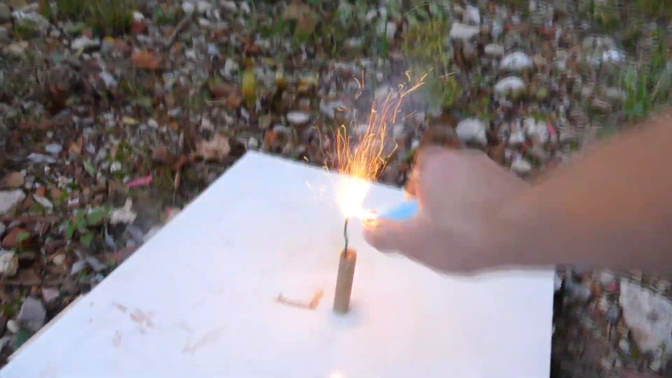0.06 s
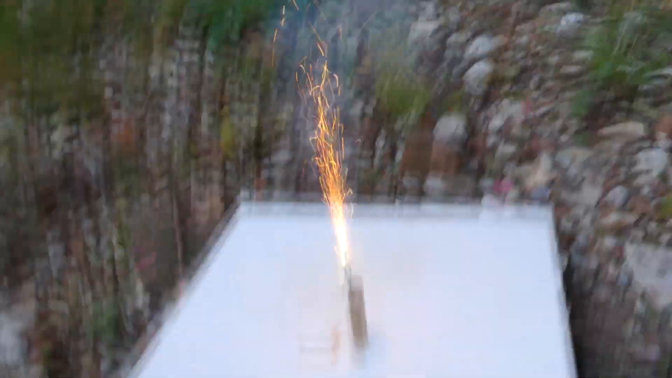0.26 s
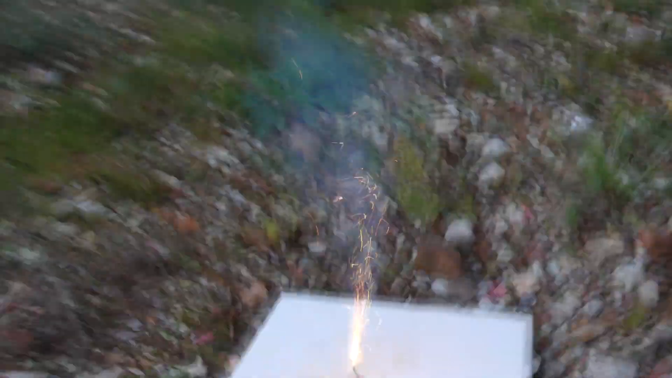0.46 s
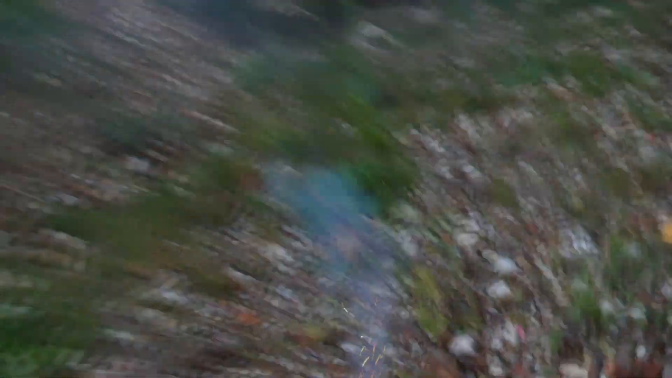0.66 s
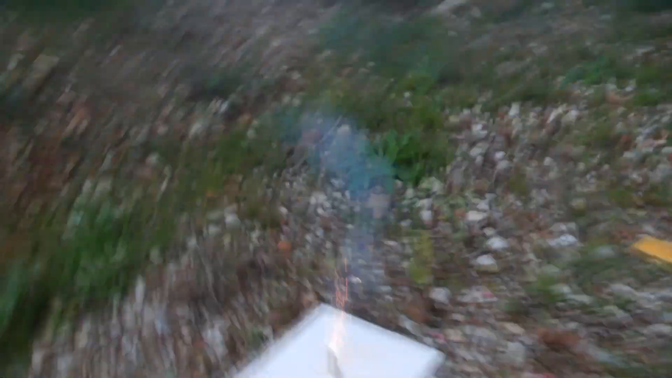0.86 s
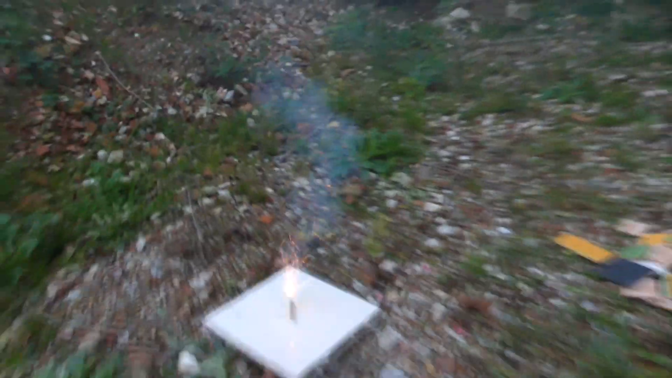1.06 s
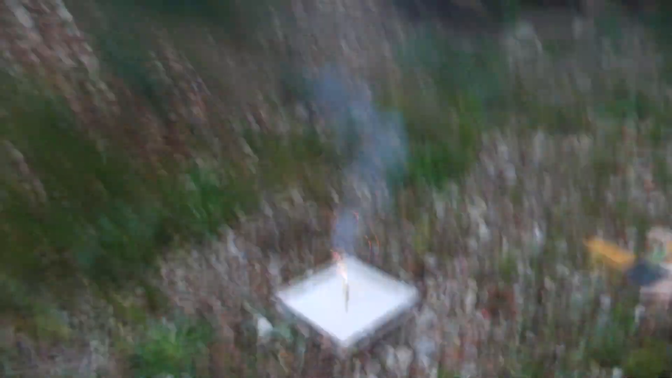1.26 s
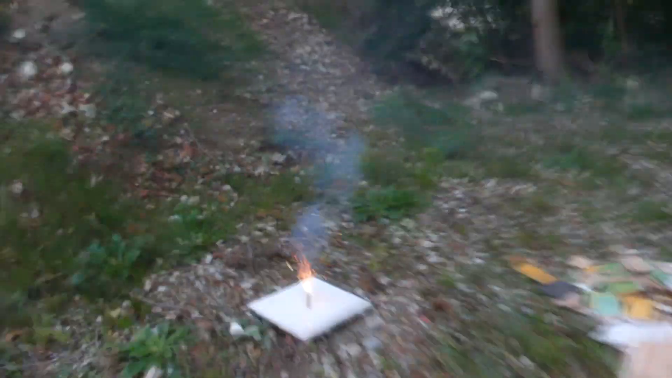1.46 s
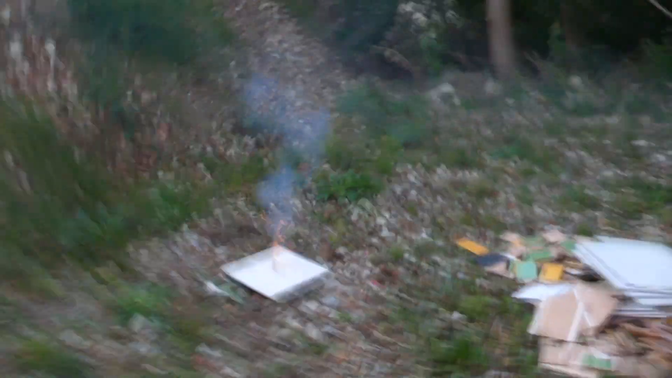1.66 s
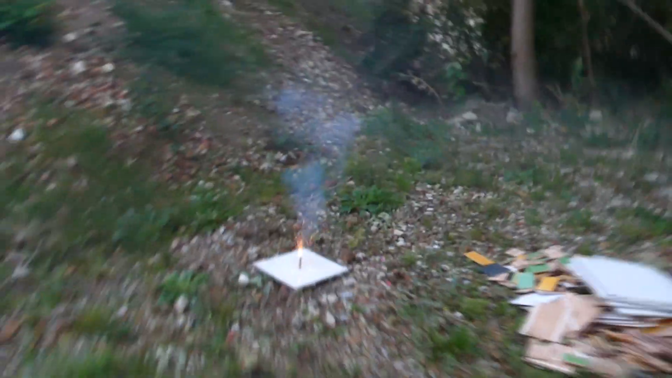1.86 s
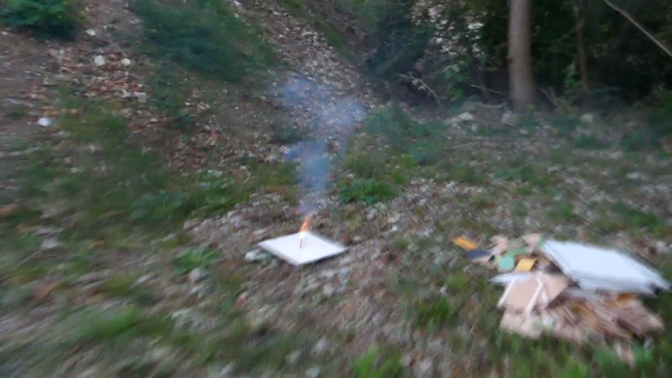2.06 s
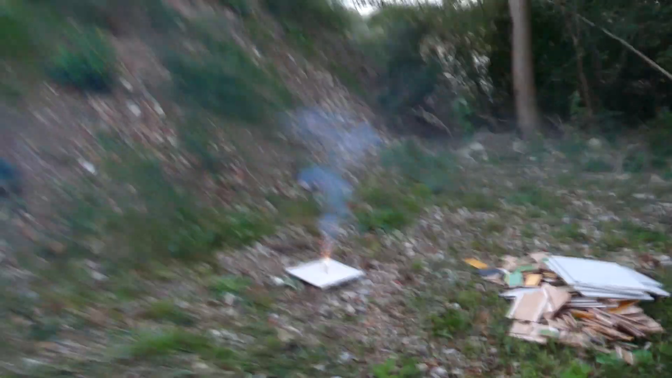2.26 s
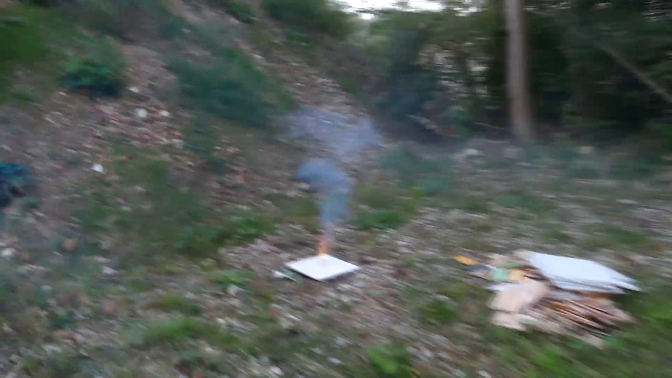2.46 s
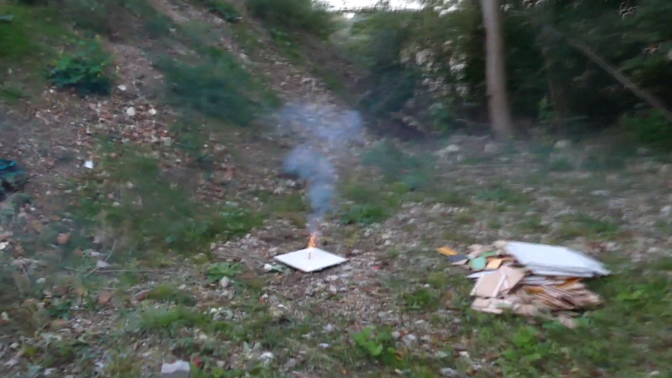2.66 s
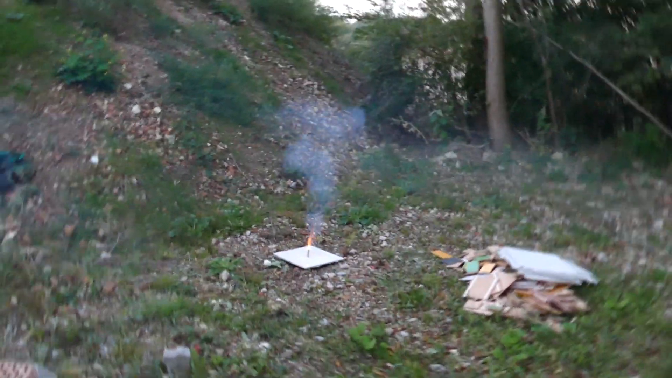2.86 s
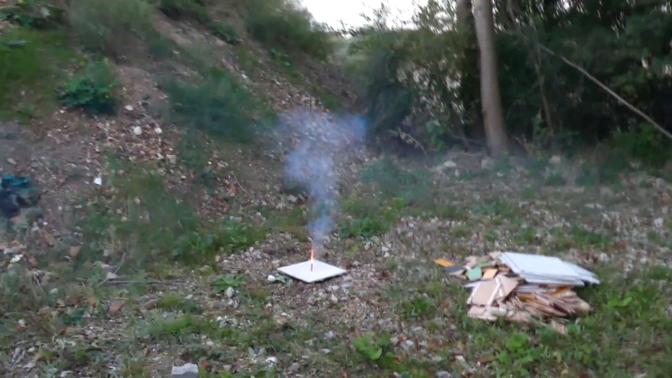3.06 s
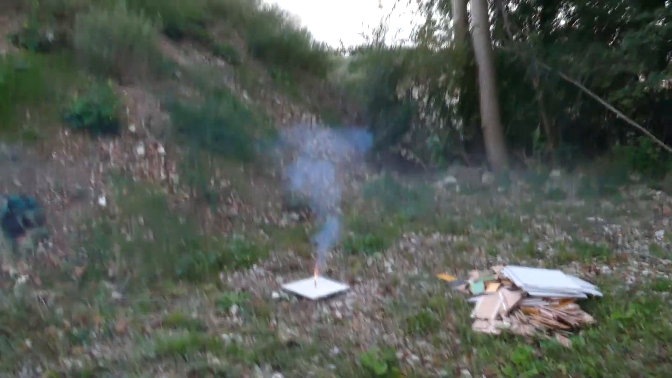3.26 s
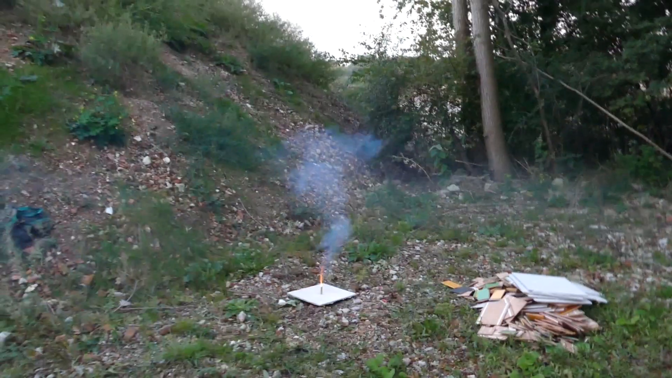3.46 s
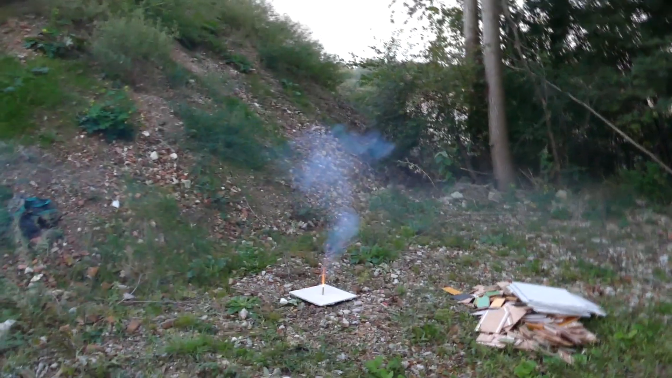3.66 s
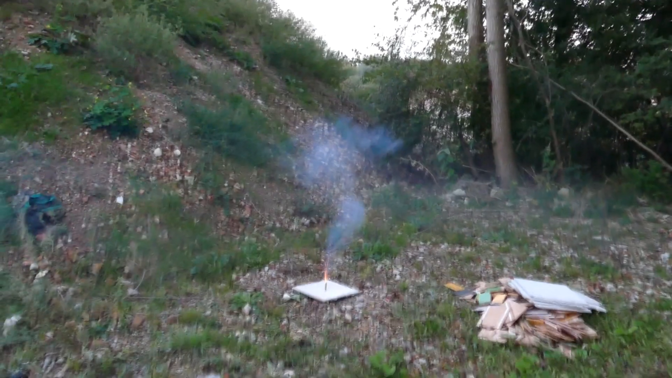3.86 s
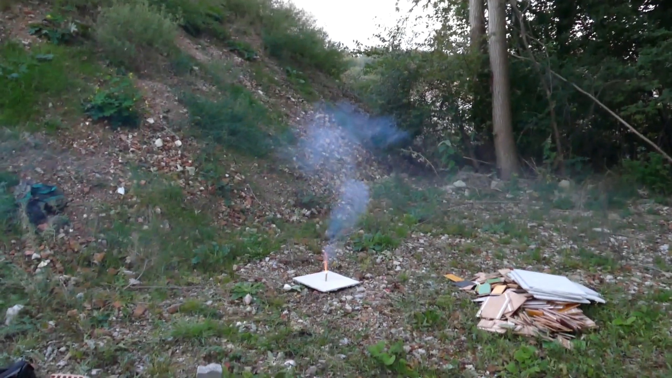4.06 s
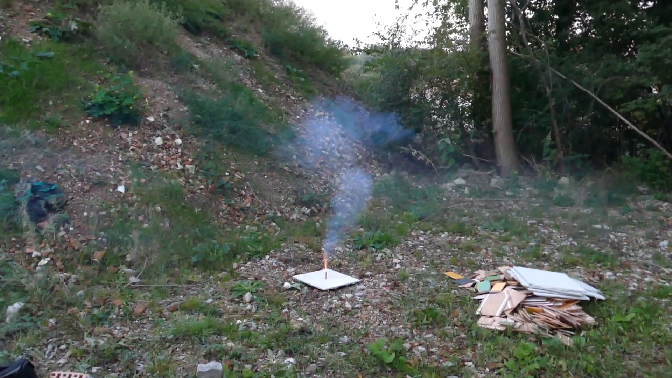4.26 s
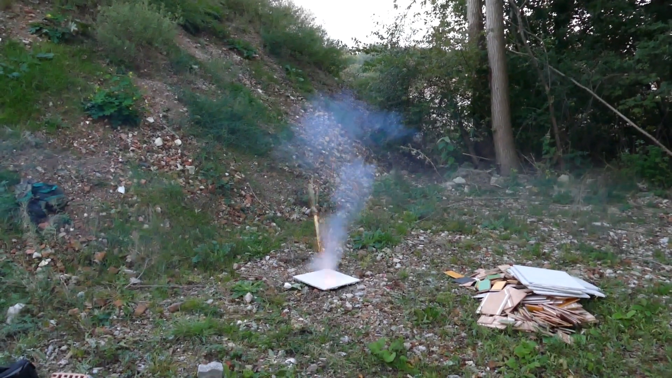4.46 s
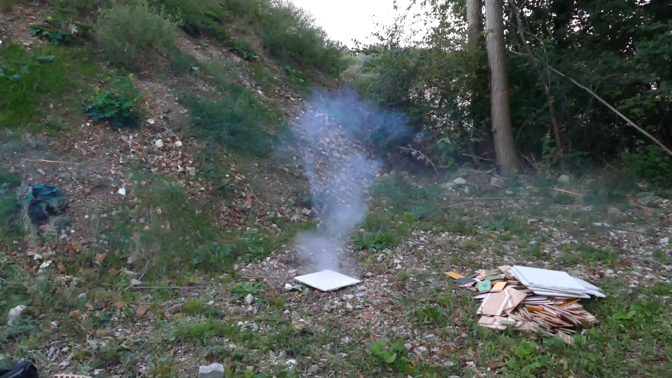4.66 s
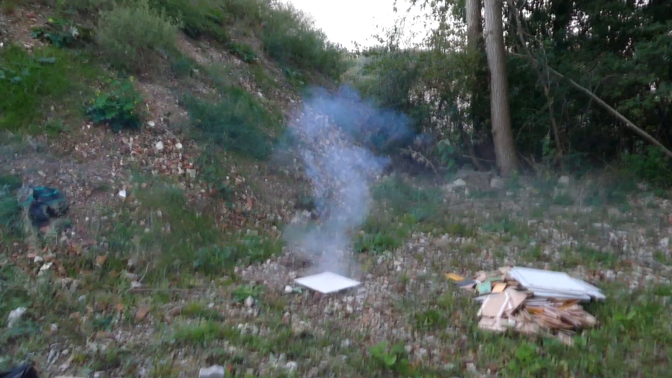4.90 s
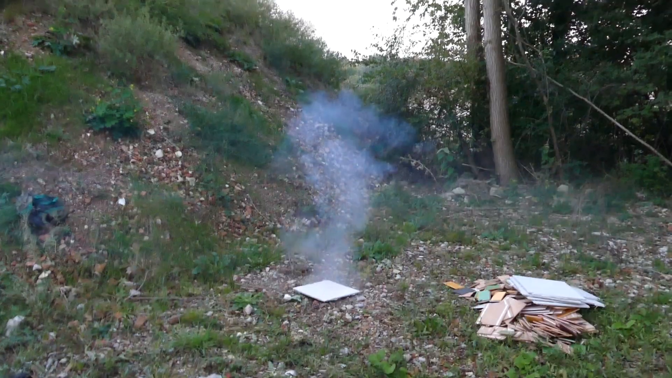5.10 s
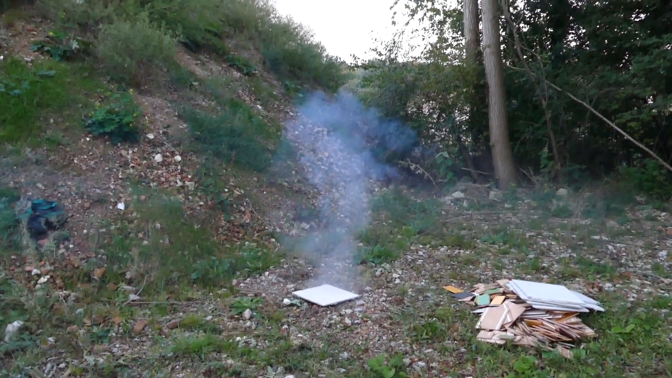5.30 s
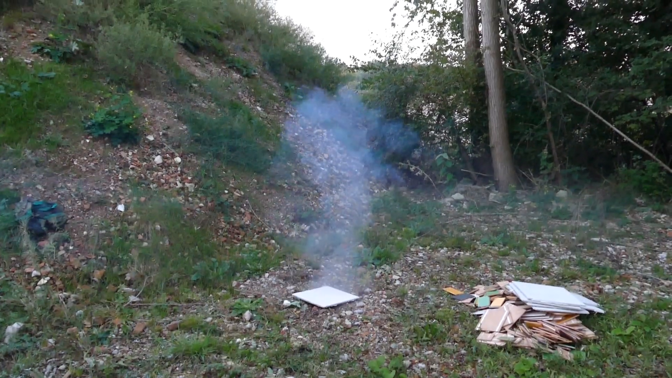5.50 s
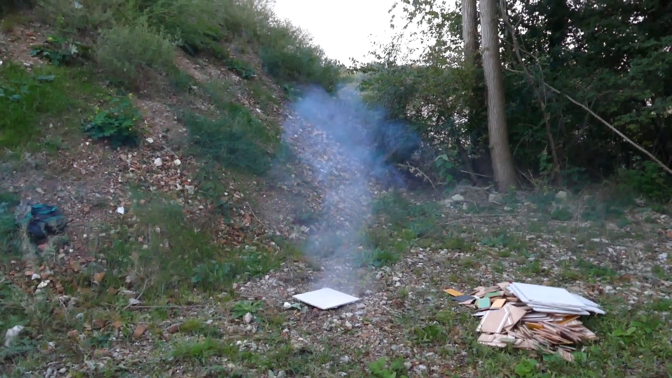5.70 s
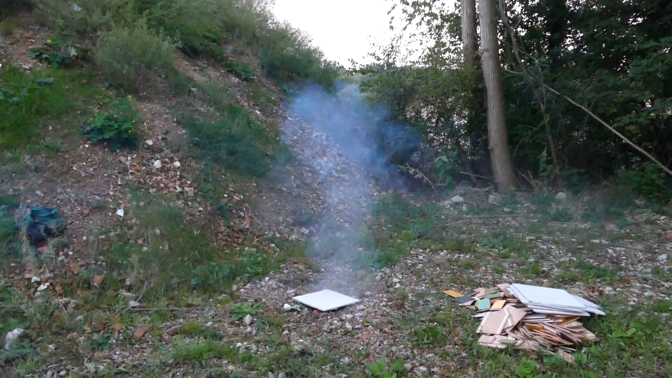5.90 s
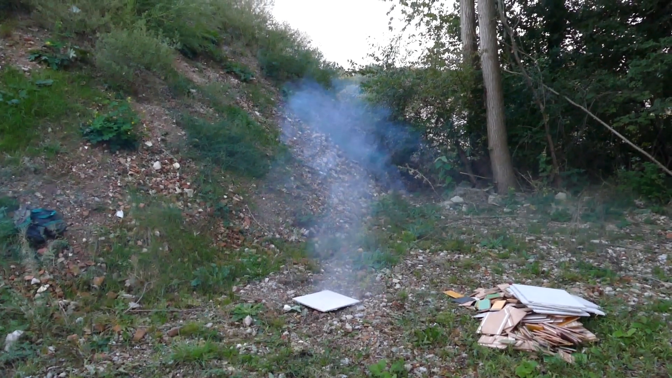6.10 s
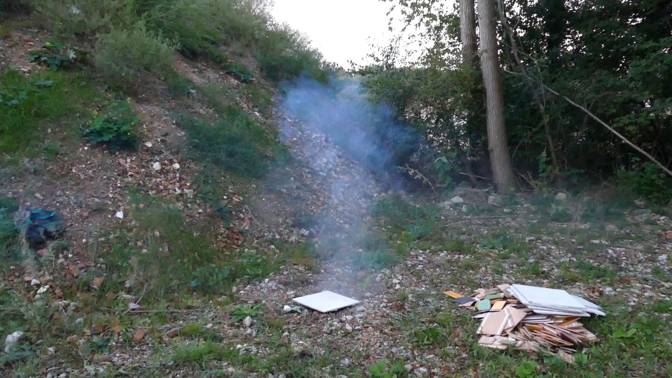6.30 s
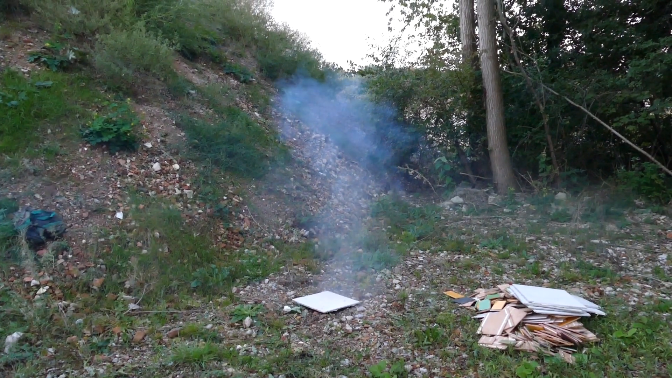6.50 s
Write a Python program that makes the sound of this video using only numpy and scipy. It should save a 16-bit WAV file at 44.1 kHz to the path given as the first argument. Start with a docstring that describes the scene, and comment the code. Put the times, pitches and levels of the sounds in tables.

```python
"""A homemade banger on a board in a gravel pit, over a far, low background with a faint hum.
Its fuse, a gas jet made of coloured noise, catches and hisses, with pops, while the camera backs away over
the stones: shoes knock pebbles, air and jolts shake the camera, and the ground echo sweeps up through the hiss.
The flame roars out of the tube, which bursts: a pressure wave and dense noise echoes overload the microphones.
The bank and woods throw the bang back, then grit patters down as small noise ticks."""
import sys
import numpy as np
from scipy import signal
from scipy.fft import rfft, irfft
from scipy.io import wavfile
from scipy.ndimage import uniform_filter1d

SR = 44100
rng = np.random.default_rng(int(sys.argv[2]) if len(sys.argv) > 2 else 0)


def unload_wav(signal):
    """Save mono or channel-first audio to the path in sys.argv[1] as 16-bit WAV at rate SR, clipped to [-1, 1]."""
    wavfile.write(
        sys.argv[1],
        SR,
        np.round(np.clip(np.atleast_2d(signal).T, -1, 1) * 32767).astype(np.int16),
    )


N = 288692
T = np.arange(N) / SR  # s
HZ = np.fft.rfftfreq(N, 1 / SR)
BURST_S = 4.4957  # the tube bursts

# how alike the burning powder sounds at the two microphones: (frequency [Hz], likeness [-1 to 1])
FLAME_LIKENESS = [(100, 1), (2500, 1), (5000, 0.97), (9000, 0.85), (15000, 0.83)]
# how alike far sounds are at the two microphones: (frequency [Hz], likeness [-1 to 1])
FAR_LIKENESS = [(30, 0.11), (150, 0.091), (400, 0.13), (1000, .5), (3000, .5), (8000, .2)]


def amp(db):
    """Turns decibels into a plain factor."""
    return 10 ** (np.asarray(db) / 20)


def unit(x):
    """Brings a sound to an average (rms) level of 1."""
    return x / np.sqrt(np.mean(x ** 2) + 1e-20)


def read(points, hz):
    """A spectrum joined by straight lines on a log-frequency axis."""
    f, value = np.transpose(points)
    return np.interp(np.log(hz + 1), np.log(f + 1), value)


def curve(rows, t, axis=1):
    """One column of a control table at the times t."""
    rows = np.asarray(rows)
    return np.interp(t, rows[:, 0], rows[:, axis])


def colour(x, spectrum):
    """Filters a sound by a fixed spectrum in dB."""
    return irfft(rfft(x) * amp(read(spectrum, HZ)), N)


def drift(rate_hz):
    """Random wavering of rms 1, mostly slower than the given rate."""
    return unit(irfft(rfft(rng.standard_normal(N)) / (1 + (HZ / rate_hz) ** 4), N))


def noise_pair(likeness):
    """White noise at two microphones, alike by the given amount at each frequency."""
    common, apart = rfft(rng.standard_normal((2, N)))
    c = np.clip(read(likeness, HZ), -1, 1)
    mid = common * np.sqrt((1 + c) / 2)
    side = apart * np.sqrt((1 - c) / 2)
    return irfft(np.array([mid + side, mid - side]), N)


def shaped(x, gain, size=512):
    """Filters x by gain(Hz, s), which moves with time."""
    overlap = size * 3 // 4
    hz, t, z = signal.stft(x, SR, nperseg=size, noverlap=overlap)
    return signal.istft(z * gain(hz[:, None], t), SR, nperseg=size, noverlap=overlap)[1][:, :N]


def swell(t, s, hold_s, db, rise_db_per_s, fall_db_per_s):
    """A gain that rises to its level at s, holds, and dies away."""
    before = np.maximum(s - t, 0)
    after = np.maximum(t - s - hold_s, 0)
    return amp(db - rise_db_per_s * before - fall_db_per_s * after)


def together(gains):
    """The level of unrelated sounds heard at once: their powers add."""
    return np.sqrt(sum(gain ** 2 for gain in gains))


def add(mix, s, sound):
    """Lays a short sound into the mix at time s."""
    part = mix[:, round(s * SR):][:, :sound.shape[1]]
    part += sound[:, :part.shape[1]]


def sprinkle(start, length, per_s, db, spread_db, low_hz, high_hz):
    """Random small impacts over a stretch of time, as rows (time [s], peak [dB], centre [Hz])."""
    when, size, pitch, happens = rng.random((40, 4)).T
    peak_db = db + spread_db * (2 * size - 1)
    centre_hz = low_hz * (high_hz / low_hz) ** pitch
    rows = np.transpose([start + length * when, peak_db, centre_hz])
    return rows[np.argsort(happens)[:round(per_s * length)]]


def knocks(rows, gain_db, decay, rattle_db, rattle_s, spread, apart, top_hz):
    """Each small impact is a sharp tick and a short rattle, in a broad band round its own pitch."""
    out, t = np.zeros((2, N)), np.arange(4096) / SR
    soften = signal.butter(5, min(top_hz, .45 * SR), fs=SR, output="sos")
    fade = np.exp(-t / decay) + amp(rattle_db) * np.exp(-t / rattle_s)
    for s, db, hz in rows:
        grain = rng.standard_normal((3, len(t)))
        blow = (grain[0] + apart * grain[1:]) * fade  # a shared part and one for each side
        edges = np.clip([hz / (1 + spread), hz * (1 + spread)], 30, .45 * SR)
        band = signal.butter(2, edges, "band", fs=SR, output="sos")
        tick = signal.sosfilt(soften, signal.sosfilt(band, blow))
        add(out, s, amp(db + gain_db) * tick / abs(tick).max())
    return out


def background(level_db=-46.5, swell_db=-1.23, early_db=4.5):
    """A far, dull wash of noise, stronger early on, with a faint wavering hum."""
    # colour of the wash: (frequency [Hz], relative level [dB])
    wash_colour = [(20, 10), (45, 9), (85, 3), (160, -4), (260, 0.5), (420, -1), (600, -2), (1100, -2.5),
                   (1500, -8), (2500, -20), (4000, -36), (15000, -31.5)]
    # tones of the hum, before they waver: (frequency [Hz], level [dB])
    hum_tones = [(441, -59), (670, -62.5)]
    wash_db = level_db + swell_db * drift(4) + early_db * (1 - T / T[-1])
    wash = unit(colour(noise_pair(FAR_LIKENESS), wash_colour)) * amp(wash_db)
    turns = np.cumsum(1 + .004 * drift(8)) / SR  # makes the pitch waver
    hum = sum(amp(db + 2.1 * drift(3.3)) * unit(np.sin(2 * np.pi * hz * turns)) for hz, db in hum_tones)
    return (wash + hum) * amp([[0], [.5]])


def woods(slap_s=5.254, slap_db=-31, slap_hz=724, slap_length_s=.002):
    """The far woods return the bang as a short, dull roll of noise and one clear, soft slap."""
    # colour of the roll: (frequency [Hz], relative level [dB])
    roll_colour = [(200, -19.5), (400, -3.5), (620, 3), (850, -4.5), (1300, -11), (3000, -22.5),
                   (8000, -60)]
    # the roll before the left-right balance: (time [s], hold [s], level [dB], rise [dB/s], fall [dB/s])
    roll_swell = (5, 0.36, -44, 170.5, 55)
    roll = unit(colour(noise_pair(FAR_LIKENESS), roll_colour)) * swell(T, *roll_swell)
    t = T - slap_s
    slap = amp(slap_db) * np.exp(-(t / slap_length_s) ** 2) * np.sin(2 * np.pi * slap_hz * t)
    return (roll + slap) * amp([[4], [-2]])


def handling(body_hz=188, waver=0.035, jolt_db=6, left_share=-0.46):
    """Air buffets each microphone on its own; jolts make the camera body hum, its two sides in opposition."""
    # air moving past, strongest while the camera is carried backwards: (time [s], level [dB])
    buffet = [(0, -51), (.22, -37), (.7, -33), (1.0, -29), (2.1, -33), (3.0, -39.5), (3.4, -47),
              (5.0, -53.5), (6.55, -47)]
    # gusts and bumps on the microphones: (time [s], hold [s], level [dB])
    gust_rows = [(0.799, .05, -26), (1.275, 0.14, -23.5), (1.534, 0.087, -13), (1.69, 0.024, -20),
                 (1.776, 0.016, -15.5), (1.858, 0.0091, -16.5), (1.957, 0.018, -26), (2.25, 0.039, -28.5),
                 (2.423, 0.0086, -32), (3.074, .01, -34), (5.464, 0.022, -38.5), (5.69, 0.13, -41.5),
                 (6.206, 0.0093, -42.5)]
    # jolts of the camera body, before the jolt_db boost: (time [s], length [s], level [dB])
    jolts = [(0.761, 0.12, -38.5), (0.91, 0.14, -36), (1.33, 0.12, -33.5), (1.539, .15, -31.5),
             (1.763, 0.095, -38.5), (2.226, 0.12, -44.5), (2.553, 0.14, -42.5)]
    air_colour = [(8, -16.5), (22, 0.5), (33, 3.5), (60, -8.0), (110, -20), (200, -25.0),
                  (400, -49.5), (1500, -73.0)]  # (frequency [Hz], relative level [dB])
    air = unit(colour(noise_pair([(20, 0.084), (200, -0.073)]), air_colour))
    air /= np.sqrt(uniform_filter1d((air ** 2).mean(0), 2000) + .05)  # evens out chance swells
    gusts = [swell(T, *row, rise_db_per_s=900, fall_db_per_s=450) for row in gust_rows]
    out = air * together([amp(curve(buffet, T)), *gusts])
    hum = unit(np.sin(2 * np.pi * np.cumsum(body_hz * (1 + waver * drift(47))) / SR))
    for s, length, db in jolts:
        arch = np.sin(np.pi * np.clip((T - s) / length, 0, 1))
        out += amp(db + jolt_db) * hum * arch * np.array([[left_share], [1]])
    return out


def footsteps():
    """Each step shifts a few small stones; larger ones knock out clearly."""
    # larger stones under the shoes, before the overall gain: (time [s], peak [dB], centre [Hz])
    stones = [(0.83, -24.5, 350), (1.252, -32, 305), (1.34, -25.5, 388), (1.385, -30, 310),
              (2.109, -25, 298), (2.219, -27, 1198), (2.239, -22.5, 326), (2.271, -26, 657),
              (2.288, -25.5, 1332), (2.768, -30, 700), (2.969, -29.5, 920), (3.46, -26, 1940)]
    # shoes on the gravel, before the overall gain: (time [s], length [s], middle peak of small stones [dB])
    steps = [(0.779, 0.071, -26.5), (1.248, 0.16, -33.5), (2.13, .17, -28), (2.921, .06, -40)]
    small = []
    for s, length, db in steps:
        small.extend(sprinkle(s, length, per_s=36, db=db, spread_db=4, low_hz=300, high_hz=1300))
    return knocks([*stones, *small], gain_db=1.0, decay=0.0014, rattle_db=-11.5, rattle_s=0.013,
                  spread=1.0, apart=0.29, top_hz=2070)


def patter(per_s=500, size_db=3.0):
    """Dust and paper shreds sprinkle the ground on both sides: single clicks of random size."""
    # the landing of the dust: (time [s], hold [s], level [dB], rise [dB/s], fall [dB/s])
    dust = (5, 1, -58.5, 49.5, 20)
    size = amp(size_db * np.minimum(rng.exponential(1, (2, N)), 4))
    ticks = size * rng.choice([-1, 1], (2, N)) * (rng.random((2, N)) < per_s / SR)
    both_sides = ticks + 0.27 * ticks[::-1]  # each side faintly hears the other
    ticks = colour(both_sides, [(500, -14), (3000, -3.5), (8000, 0.5), (15000, -4.5)])
    return unit(ticks) * swell(T, *dust) * (T > BURST_S)


def grit():
    """Bits thrown up by the bang tick back down on the gravel."""
    # larger bits landing, before the overall gain: (time [s], peak [dB], centre [Hz])
    large = [(5.002, -28, 11000), (5.1444, -30, 8000), (5.18, -27, 10000), (5.2352, -34, 10850),
             (5.3734, -27, 7000), (5.421, -26.5, 6000), (5.5465, -31, 7940), (5.5974, -31, 7020),
             (5.6433, -32, 4600), (5.675, -36, 3300), (5.7735, -28, 10940), (6.0992, -34.5, 5480),
             (6.2793, -31, 12000), (6.302, -33.5, 3000)]
    small = sprinkle(5.3, 6.4 - 5.3, per_s=12, db=-40, spread_db=3, low_hz=3200, high_hz=11500)
    return knocks([*large, *small], gain_db=-4.5, decay=0.00028, rattle_db=-9, rattle_s=0.0034,
                  spread=0.66, apart=0.66, top_hz=14780)


def fuse(sputter_db=0.54, flutter_db=0.77, catch_s=0.021, catch_db=-27.5, flare_rise_s=.028, flare_settle_s=0.066,
         mouth_start_s=3.82, mouth_end_s=4.29, mouth_edge_s=.1, mouth_height=1.0, mouth_width_hz=1500,
         mouth_start_hz=7700, mouth_end_hz=5100, mouth_glide_s=0.12):
    """A sputtering gas jet, heard directly and off the ground; the echo delay shrinks as the camera retreats."""
    # the flame before flares and flutter: (time [s], level [dB], lower hiss relative to it [dB])
    flame = [(0.09, -18.5, -5.5), (0.33, -22.5, -4), (0.6, -31, 0.5), (1.05, -30.5, -6.5),
             (1.32, -32.5, -5.5), (1.62, -34.0, -6.5), (2.05, -37.5, -7.5), (2.4, -40.5, -6),
             (2.5, -37.5, -9), (2.98, -36.5, -8.0), (3.1, -38.0, -8), (3.36, -35.5, -10),
             (3.72, -30.0, -13), (3.87, -35.5, -12.5), (3.93, -33.5, -16), (4.23, -34.5, -14.5),
             (4.31, -41.5, -14.5), (4.43, -36.5, -18)]
    # first peak of the echo's comb before the gravel shift, 1 / delay: (time [s], frequency [Hz])
    ground_comb = [(0, 1780), (.5, 1880), (.85, 2117), (1.1, 2470), (1.3, 2901), (1.6, 3837), (1.95, 4500),
                   (2.35, 6000), (3.1, 6955), (4.45, 7100)]
    # share of the sound that the ground returns: (frequency [Hz], share [factor])
    ground_share = [(500, .6), (2000, .62), (5000, .42), (10000, .3), (15000, .26)]
    # phase shift that loose gravel gives the echo, for the longest waves: (time [s], shift [radians])
    gravel_shift = [(.6, 0.5), (1.2, 1.3), (2.1, 1.34), (3.0, 0.13)]
    # ingredients of the hiss colour, close by and from afar: (frequency [Hz], relative level [dB])
    near_colour, far_colour = [(100, -25.5), (240, -3.5), (340, -14), (550, 2.5), (780, 2), (1000, -5),
                               (1600, 1), (3000, -3.5), (5000, 0), (7500, 6.5), (10000, 1.5), (13000, -1.5),
                               (15500, -2.5)], [(100, -17), (500, -18.5), (1400, -12.5), (2400, -0.5),
                                                  (3200, 1), (4100, -1.5), (5500, -1), (7700, 4), (9500, 1),
                                                  (11500, -1.5), (13500, 0.5), (15500, -4.5)]
    # narrow resonances that grow with the retreat: (centre [Hz], width [Hz], full height above the rest [factor])
    resonances = [(3080, 110, 0.98), (4995, 150, .3), (7640, 280, .45)]
    # the fuse lies a little to the left: (time [s], lag at the right microphone [s])
    bearing = [(0, 0.0000085), (.45, 0.00002), (.72, 0.000024), (1.0, 0.000014), (1.7, 5e-6),
               (4.4, 0.0000016)]
    # the flame flares up round each pop, then settles: (time [s], rise in level [dB])
    flare_rows = [(1.12, 7.5), (1.487, 2), (4.475, 10.5)]

    def gain(hz, t):
        away = np.clip(t / 3.3, 0, 1)  # 0 = close by, 1 = fully backed away
        # the near colour starts at half strength and ends at minus half
        jet = amp((0.5 - away) * read(near_colour, hz) + away * read(far_colour, hz))

        # the flame sinks into the tube's mouth, whose resonance slides down
        sunk = np.clip(np.minimum(t - mouth_start_s, mouth_end_s - t) / mouth_edge_s, 0, 1)
        glide = np.exp(-np.maximum(t - mouth_start_s, 0) / mouth_glide_s)
        mouth_hz = mouth_end_hz + (mouth_start_hz - mouth_end_hz) * glide
        mouth = (mouth_hz, mouth_width_hz, mouth_height * sunk)
        bumps = sum(height / (1 + (2 * (hz - f) / width) ** 2) for f, width, height in [*resonances, mouth])
        peaks = 1 + away ** 6 * bumps

        lag = hz / curve(ground_comb, t)  # in cycles
        shift = curve(gravel_shift, t) * np.exp(-(lag / .8) ** 2)
        ground = 1 + read(ground_share, hz) * np.exp(1j * (shift - 2 * np.pi * lag))
        heard = jet * peaks * abs(ground)

        top = (hz > 5000) & (hz < 15000)
        low = (hz > 1500) & (hz < 4500)
        top_rms, low_rms = (np.sqrt(np.mean(heard ** 2 * band, 0)) for band in (top, low))
        fullness = amp(curve(flame, t, axis=2)) * top_rms / low_rms  # a fuller flame hisses lower
        heard = heard / top_rms * fullness ** (1 / (1 + (hz / 5000) ** 6))
        return np.array([heard, heard * np.exp(-2j * np.pi * hz * curve(bearing, t))])

    flares = 0
    for s, db in flare_rows:
        flares = flares + db * np.exp(-np.maximum((s - T) / flare_rise_s, (T - s) / flare_settle_s))
    catching = catch_db * np.exp(-T / catch_s)  # starts below the full flame
    level = curve(flame, T) + catching + flares + sputter_db * drift(300) + flutter_db * drift(29)
    hiss = shaped(noise_pair(FLAME_LIKENESS), gain, size=1024)
    return hiss * amp(level) * (T < BURST_S)


def spits(rise=0.00065):
    """Pockets of powder pop, as short noise with a low thump; at last the flame roars out of the tube's mouth."""
    # pops and last spits, before rise and decay: (time [s], level [dB], decay [s], thump relative to it [dB])
    pops = [(1.1104, -13, 0.0055, 1.5), (1.4856, -16.5, 0.0071, -3.5), (4.4504, -16, 0.0011, -7.5),
            (4.4703, -1.5, .0008, -15), (4.479, -13, 0.0011, -16.5), (4.482, -5.5, .001, -26.5),
            (4.485, -1, 0.0015, -17.5)]
    # colours of the bright jet and the low thump: (frequency [Hz], relative level [dB])
    jet_colour, thump_colour = [(100, -4), (600, 1), (1200, -4), (3000, -5), (5000, -7.5), (6500, -2),
                                (7600, 4), (9500, -5), (11500, -7.5), (14000, -4.5), (16000, -18)], [(40, -18), (120, 1), (240, 2.5), (450, -6.5),
                                                    (900, -11.5), (1600, -17), (4000, -18.5),
                                                    (12000, -36.5)]
    jet = unit(colour(noise_pair(FLAME_LIKENESS), jet_colour))
    thump = unit(colour(noise_pair(FLAME_LIKENESS), thump_colour))
    out = jet * swell(T, 4.4935, hold_s=0, db=-1.5, rise_db_per_s=1250.5, fall_db_per_s=1901.5)
    for s, db, decay, thump_db in pops:
        t = np.maximum(T - s, 0)
        fade = (1 - np.exp(-t / rise)) * np.exp(-np.minimum(t / decay, 20))
        out += amp(db) * fade * (jet + amp(thump_db) * thump)
    return out


def bang(push_db=18, push_s=0.0017, suction_db=5, rebound_db=-17, crackle_db=2.5, lumpy_db=0.65, left_db=-2.0,
         crack_db=14.5, crack_fall_db_per_s=1599, slap_s=4.695, slap_length_s=0.008, slap_db=0.5):
    """A pressure step with a long suction after it, then dense echoes that dull as they travel."""
    # colour of the bang: (frequency [Hz], relative level [dB])
    bang_colour = [(25, -11.5), (100, -8.5), (250, -12.5), (420, -3), (650, -0.5), (1150, 0), (1800, -4.5),
                   (3000, -6), (5000, -7.5), (7500, -7), (10000, -11.5), (15000, -16)]
    # how alike the two microphones hear it: (frequency [Hz], likeness [-1 to 1])
    bang_likeness = [(50, 0.39), (300, 0.49), (1000, .62), (2500, 0.68), (5000, 0.53), (9000, 0.14),
                     (15000, .1)]
    # what the air swallows: (frequency [Hz], loss per second of travel [dB/s])
    air_loss = [(100, 12), (600, 1), (1500, 3), (3000, 9), (6000, 19.5), (9000, 31.5), (15000, 78)]
    # scatter from near stones, bank, trees and the land beyond, before the air's loss and the balance:
    # (time at full level [s], hold [s], level [dB], rise [dB/s], fall [dB/s])
    scatter = [(4.547, 0.072, 4.5, 60, 134.5), (4.804, 0.027, -17, 300, 80.5),
               (5.108, .02, -37.5, 100, 21.5)]
    since = np.maximum(T - BURST_S, 0)
    u = since / push_s
    wave = amp(push_db) * (1 - u) * np.exp(-np.minimum(u, 20)) * (u < 20)
    suction = -amp(suction_db) * np.exp(-((T - 4.508) / 0.0083) ** 2)
    rebound = amp(rebound_db) * np.exp(-((T - 4.6) / 0.13) ** 2)  # the pressure swings slowly back

    shocks = noise_pair(bang_likeness) * amp(crackle_db * drift(2500))  # small shocks of differing size
    echoes = shaped(unit(colour(shocks, bang_colour)),
                    lambda hz, t: amp(-read(air_loss, hz) * np.maximum(t - BURST_S, 0)))
    crack = amp(crack_db - crack_fall_db_per_s * since)  # the bursting tube itself
    slap = slap_db * np.exp(-((T - slap_s) / slap_length_s) ** 2)  # off the bank, lifts the scatter
    echoes *= together([crack] + [swell(T, *row) for row in scatter]) * amp(slap + lumpy_db * drift(55))
    return (wave + suction + rebound + echoes * amp([[left_db], [0]])) * (T >= BURST_S)


def scene():
    """Fuse, footsteps, bang and falling grit, in the open air."""
    surroundings = background() + woods() + handling()
    on_the_gravel = footsteps() + patter() + grit()
    banger = fuse() * amp([[-.2], [.4]]) + spits() + bang()
    return surroundings + on_the_gravel + banger


def record(dry, ceiling=0.95, shadow_hz=3000, edge_hz=15800):
    """Close echoes ripple the treble; the left microphone differs in the bass; both overload on the bang."""
    # weak echoes off the camera and the person holding it: (delay [s], share [factor])
    near_echoes = [(.0021, .05), (.0034, .07), (.0052, .09), (.0061, .07), (.0083, .09)]
    echoes = sum(share * np.exp(-2j * np.pi * HZ * delay) for delay, share in near_echoes)
    ripple = 1 + echoes * HZ / np.hypot(HZ, shadow_hz)  # long waves bend round small things
    left, right = irfft(rfft(dry) * ripple, N)
    left = colour(left, [(30, 0.0), (200, -3.5), (500, -1.5), (1000, -0.5), (2000, 0.5)])
    heard = np.array([left, right])
    clipped = heard / (1 + (heard / ceiling) ** 8) ** (1 / 8)  # a rounded limit
    low_pass = signal.firwin(511, edge_hz, window=("kaiser", 9), fs=SR)
    return signal.oaconvolve(clipped, low_pass[None], "same")


dry = scene()
out = record(dry)
unload_wav(out)
```